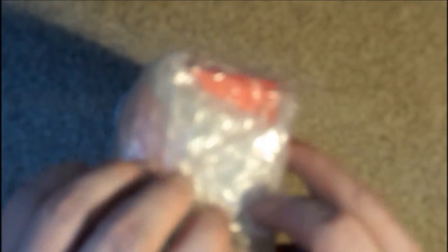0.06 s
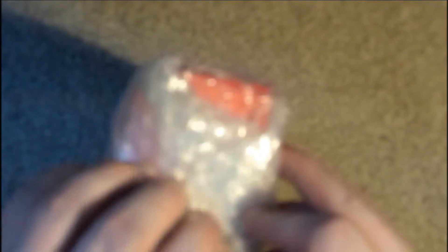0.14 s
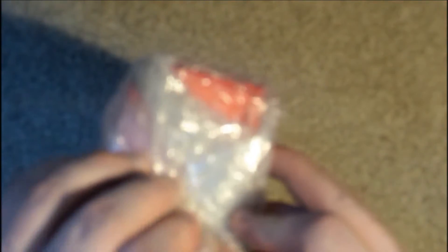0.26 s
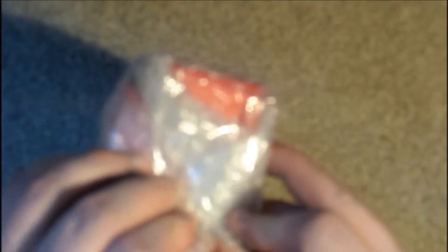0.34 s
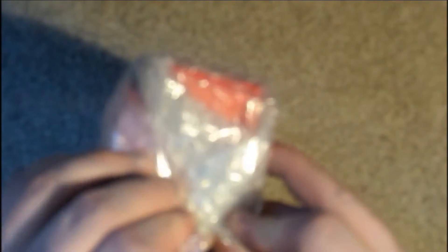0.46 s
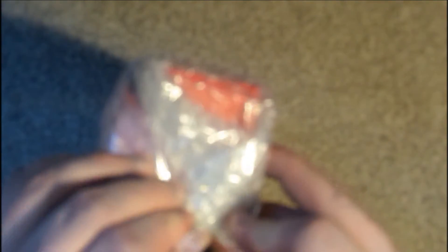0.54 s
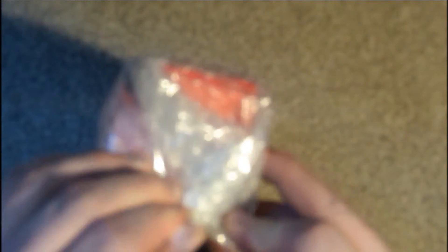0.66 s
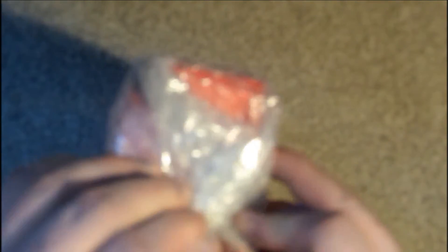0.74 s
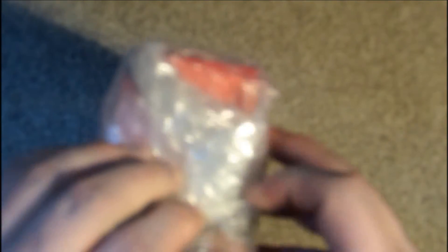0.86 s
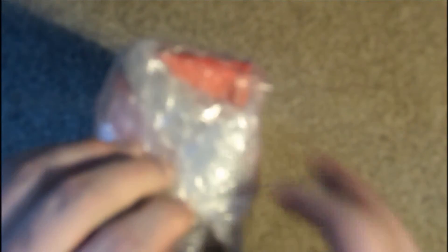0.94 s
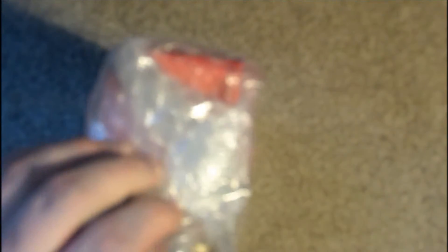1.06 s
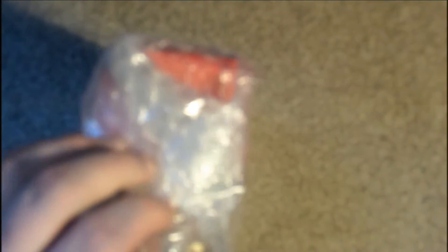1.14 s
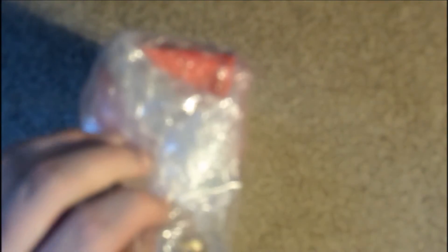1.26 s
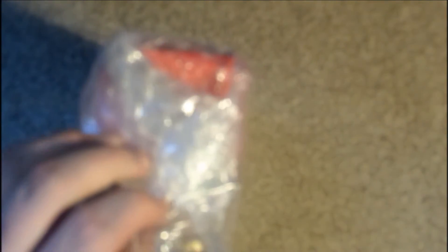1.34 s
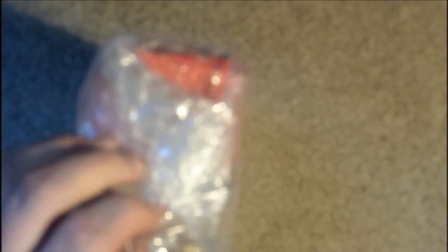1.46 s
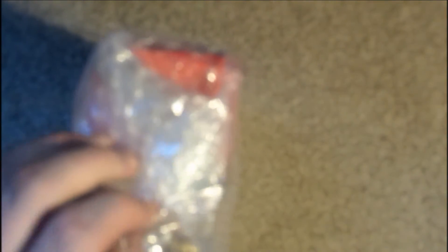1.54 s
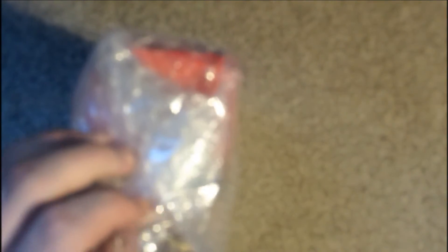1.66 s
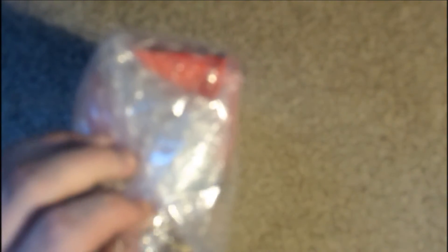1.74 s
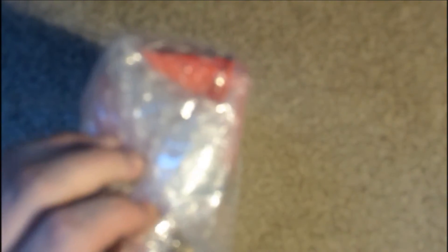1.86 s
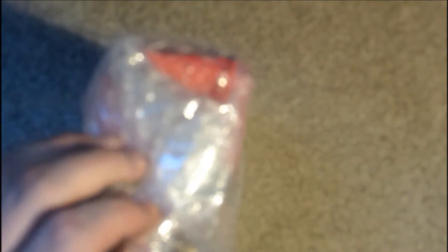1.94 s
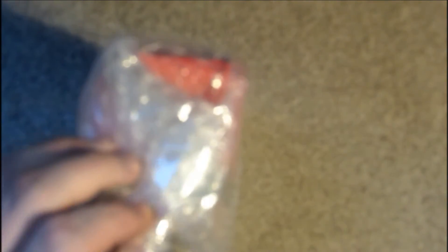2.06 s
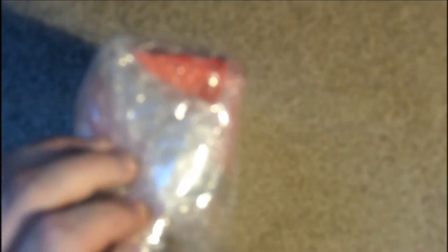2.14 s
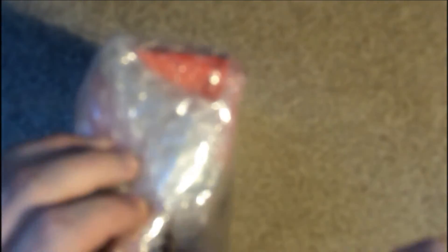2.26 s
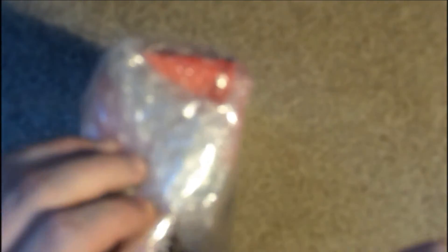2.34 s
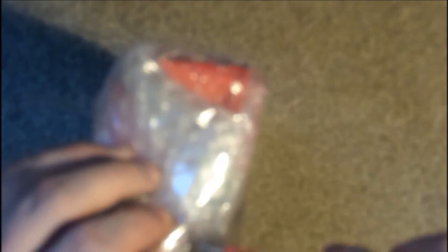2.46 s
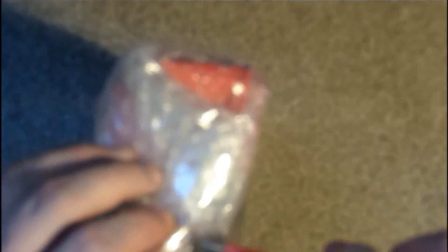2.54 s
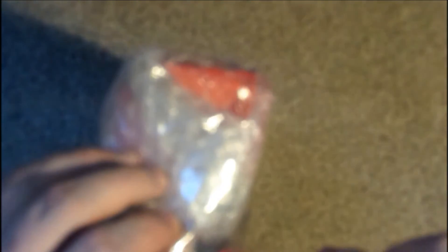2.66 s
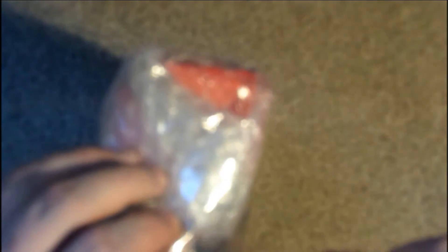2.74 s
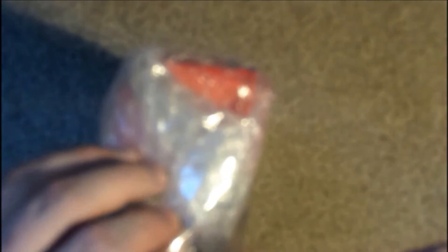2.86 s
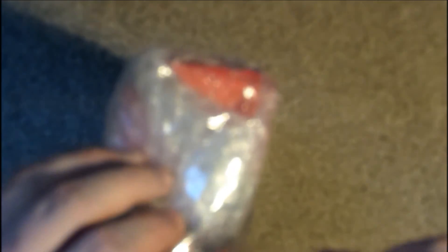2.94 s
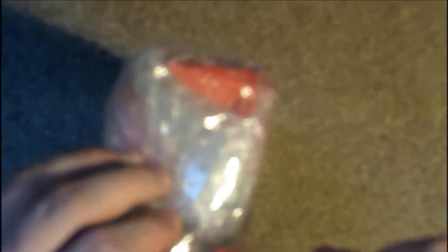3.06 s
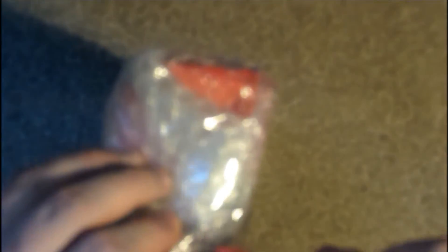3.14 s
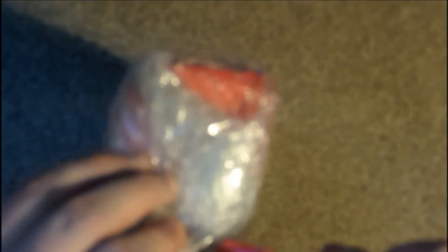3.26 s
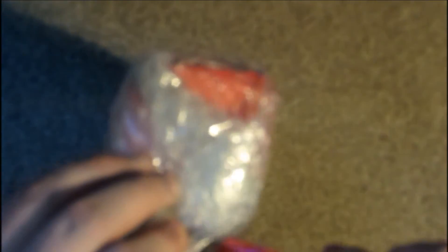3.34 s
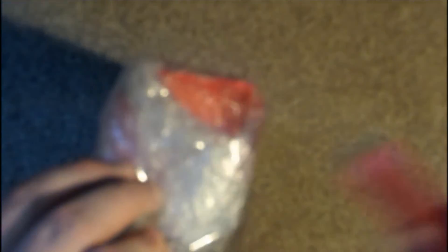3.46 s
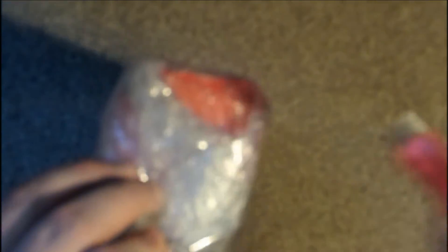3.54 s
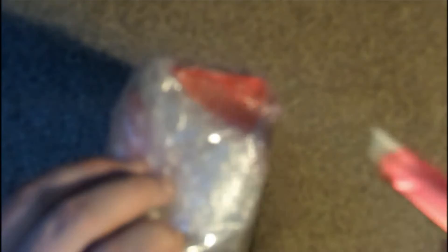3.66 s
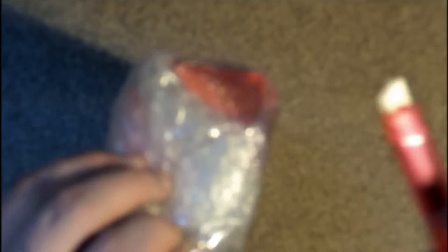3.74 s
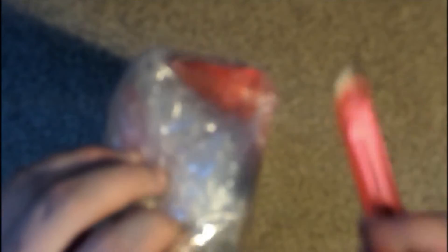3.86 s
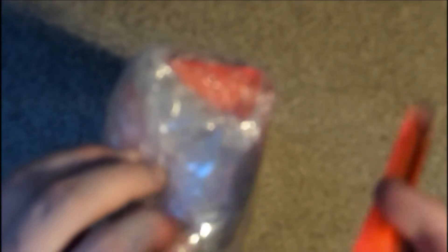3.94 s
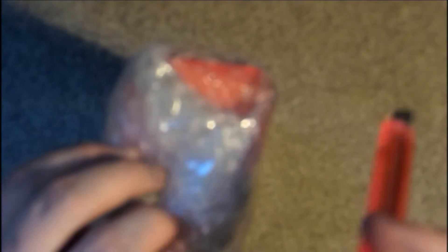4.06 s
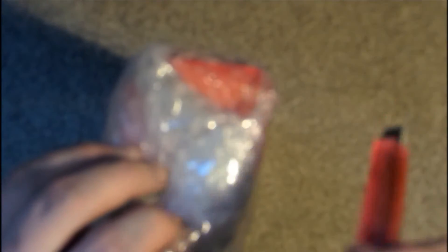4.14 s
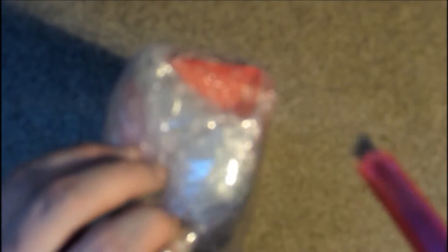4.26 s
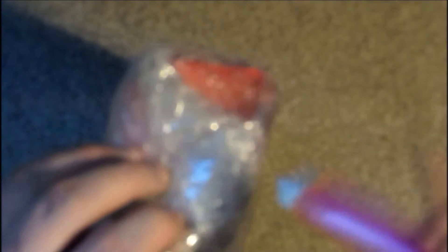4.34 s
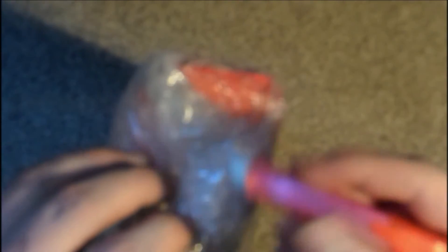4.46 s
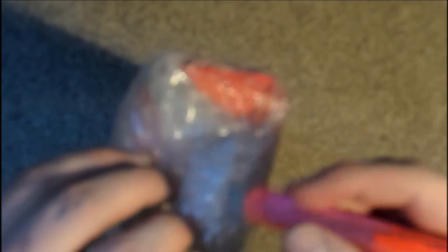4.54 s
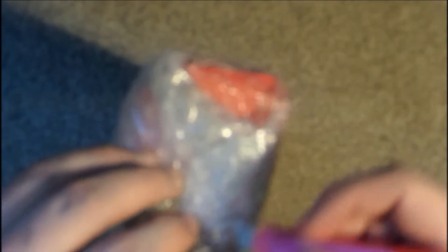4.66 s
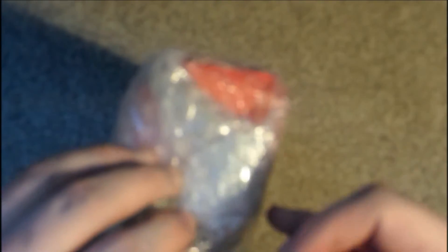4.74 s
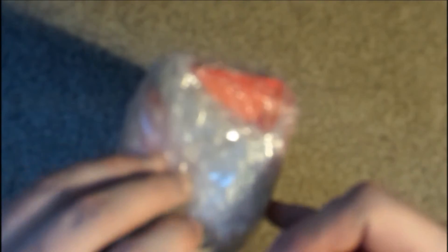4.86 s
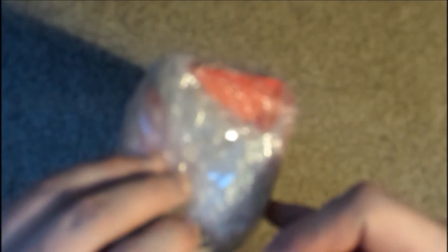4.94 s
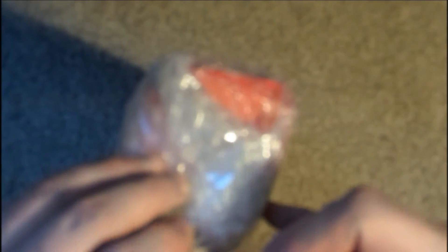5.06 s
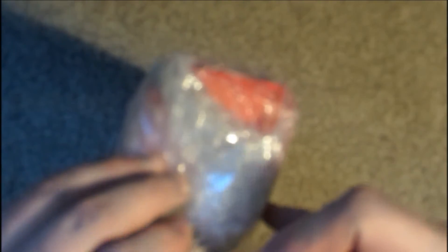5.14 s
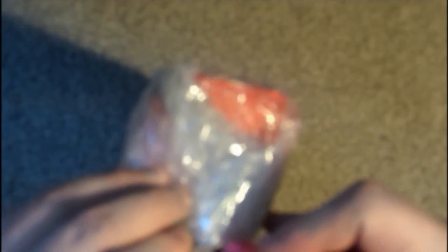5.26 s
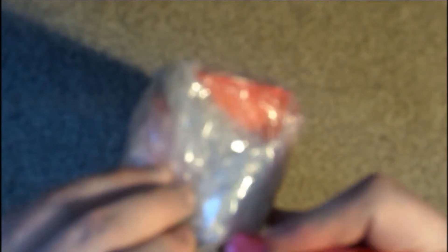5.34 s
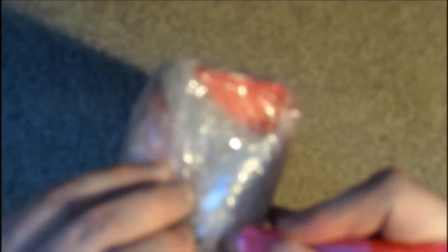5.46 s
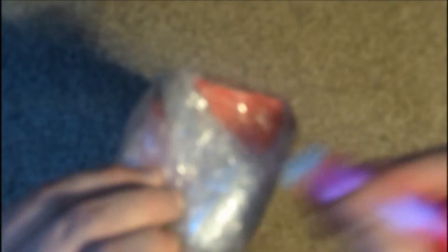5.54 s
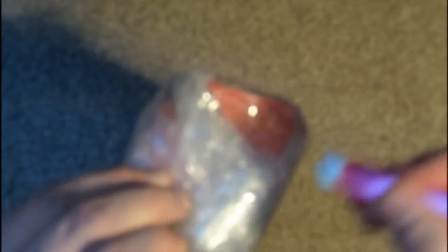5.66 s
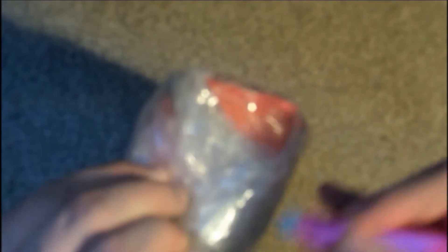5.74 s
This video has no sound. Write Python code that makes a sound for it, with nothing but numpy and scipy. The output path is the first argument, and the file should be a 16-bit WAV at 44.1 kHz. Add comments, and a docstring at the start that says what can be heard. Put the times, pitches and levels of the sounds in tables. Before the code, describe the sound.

Close to a small microphone, plastic wrapping crackles brightly as hands squeeze a package and rub it on the carpet. A seam peels briefly, then the crinkling turns sparse and soft, and a small blade ticks faintly twice. One loud crack comes past the middle, then a cluster of little pops, and two more hard snaps with finger knocks near the end. The room is quiet, with a short reverb and low background tone.

```python
"""A flurry of sharp crackles, close to a small microphone: fingers work a parcel of thin plastic film
on the carpet of a quiet room. Creases snap over, singly and in flurries; the film rustles and the
parcel rubs on the floor. Dimples pop with a pitch, fingers knock and drag, a sticky seam peels,
and twice a small steel blade ticks and rings. Behind it all lie a short reverb and low room tone."""
import sys
import numpy as np
from scipy import signal
from scipy.fft import rfft, irfft, next_fast_len
from scipy.io import wavfile
from scipy.ndimage import uniform_filter1d, map_coordinates

SR = 44100
rng = np.random.default_rng(int(sys.argv[2]) if len(sys.argv) > 2 else 0)


def wav_out(sig):
    """Save sig, one row per channel (or a flat mono array), as 16-bit PCM at SR to the path in sys.argv[1]."""
    wavfile.write(sys.argv[1], SR, np.round(np.clip(np.atleast_2d(sig).T, -1, 1) * 32767).astype(np.int16))


N = 255780

# Levels in the tables are relative.
# creases snapping over: (time [s], crack level [dB], panel flex level [dB])
CREASE_SNAPS = [(0.0414, -32, -27), (0.053, -13.5, -25.5), (0.0833, -30, -27.5), (0.1135, -20.5, -24.5),
                (0.1463, -17.5, -29), (0.163, -18.5, -29.5), (0.1764, -17, -30), (0.193, -9.5, -33),
                (0.2255, -11.5, -45), (0.238, -22, -32), (0.306, -8, -23), (0.3345, -19, -40),
                (0.3393, -23, -49), (0.3751, -18, -31), (0.7022, -19, -32), (0.707, -13.5, -31.5),
                (0.841, -26, -42), (0.8605, -21, -41), (0.8935, -18, -40), (0.9335, -26, -41),
                (1.5198, -21.5, -37.5), (1.779, -40, -40), (1.7923, -27.5, -34.5), (1.852, -33, -41),
                (1.9632, -20, -32), (2.0022, -36, -37.5), (1.921, -35.5, -38), (2.157, -33.5, -58),
                (2.367, -32, -36), (2.4145, -36.5, -30.5), (2.4777, -30, -55), (2.5614, -42, -35),
                (2.591, -45, -37.5), (2.774, -31, -35.5), (2.8045, -37, -41), (2.813, -27, -32),
                (2.83, -40, -36), (2.942, -34, -29), (2.9758, -25, -58), (3.0244, -41, -33),
                (3.086, -36, -57), (3.126, -26, -33.5), (3.32, -26.5, -37), (3.4781, -4, -54),
                (3.48, -11.5, -11.5), (3.604, -28.5, -35.5), (3.6445, -33, -44), (3.679, -29.5, -50),
                (3.765, -26.5, -32), (3.83, -44.5, -38.5), (3.925, -28.5, -40), (3.976, -29.5, -44),
                (4.037, -23, -37.5), (4.3319, -28, -58), (4.351, -29.5, -37), (4.37, -32, -55),
                (4.396, -32, -59.5), (4.4102, -44, -20.5), (4.4177, -17, -22.5), (4.4212, -23, -36),
                (4.4469, -20.5, -22.5), (4.4669, -25.5, -28.5), (4.511, -29, -59), (4.5434, -26.5, -30),
                (4.581, -31, -33), (4.5899, -30.5, -28), (4.6634, -32, -33), (4.692, -29, -32),
                (4.748, -32.5, -60), (5.0986, -36, -57), (5.2311, -8, -10.5), (5.2983, -26.5, -49),
                (5.347, -32, -35), (5.367, -27, -36.5), (5.452, -35, -63.5), (5.5463, -28, -33),
                (5.567, -8, -27), (5.5715, -12, -12), (5.726, -25, -60), (5.7837, -36.5, -40.5)]
# resonances of taut panels of film: (frequency [Hz], width [Hz], level [dB])
PANEL_MODES = [(3300, 4100, 5), (5580, 5000, 5)]
# hollows of the parcel: (frequency [Hz], width [Hz], level [dB])
PARCEL_MODES = [(202, 150, -3.5), (403, 123, 0), (614, 206, -2.5), (970, 250, 1), (1545, 256, 0),
                (1833, 225, 3), (3140, 5600, -9.5)]
# the resting grip: (time [s], rustle level [dB], rubbing level [dB])
RESTING_GRIP = [(0, -36, -41), (.3, -41, -41.5), (.6, -49.5, -50.5), (.9, -53, -49.5), (1.4, -55, -62),
                (1.6, -52.5, -51.5), (1.8, -52, -59), (2.1, -55, -54.5), (2.3, -69, -66), (2.6, -77, -49),
                (2.9, -53.5, -59.5), (3.4, -46, -53.5), (4.0, -56, -60.5), (4.3, -56, -63.5),
                (4.6, -48, -50.5), (4.85, -69, -61.5), (5.2, -51, -52.5), (5.8, -50, -57.5)]
# squeezes: (peak time [s], level [dB], time to fade 10 dB [s]); a negative fade reverses the shape
FILM_SQUEEZES = [(0.15, -30, 0.2332), (0.64, -44, 0.1), (0.88, -33.5, 0.15), (1.256, -41, 0.05),
                 (1.8, -49.5, 0.27), (2.0, -49.5, 0.15), (2.18, -43.5, 0.1), (2.35, -44, -0.14),
                 (2.51, -45.5, 0.26), (2.79, -41, 0.085), (3.011, -40, 0.03), (3.13, -45, 0.05),
                 (3.33, -42.5, 0.17), (3.772, -40.5, -0.04), (4.43, -41.5, 0.06), (4.63, -42.5, 0.12),
                 (4.908, -42.5, 0.09), (5.13, -51, .1), (5.369, -42.5, 0.07), (5.568, -29, 0.0567)]
# spectrum of sliding film: (frequency [Hz], level [dB])
FILM_SPECTRUM = [(1500, -22), (2500, -4.5), (5000, -7), (9000, -9.5), (13500, -0.5), (16000, -8)]
# dimples popping: (time [s], level [dB], pitch [Hz])
DIMPLE_POPS = [(0.6546, -31, 3680), (1.6883, -29.5, 4310), (1.7917, -28, 3910), (1.9734, -34, 4450),
               (2.017, -31, 4260), (2.0275, -31, 4000), (2.219, -28, 4440), (2.466, -32.5, 1780),
               (2.823, -27.5, 4080), (3.513, -24, 3980), (4.1102, -31.5, 4750), (4.4114, -26.5, 4560),
               (4.421, -18.5, 3500), (4.4651, -26, 3560), (4.5214, -31, 3580), (4.545, -24, 5100),
               (4.5796, -28, 5030), (4.588, -25.5, 5250), (4.6284, -32.5, 4310), (4.6623, -27.5, 4400),
               (5.0548, -33, 3730), (5.1206, -30.5, 3780)]
# fingers knocking the parcel: (time [s], level [dB])
FINGER_KNOCKS = [(0.0524, -27), (0.114, -25), (0.1465, -38.5), (0.1866, -34), (0.2255, -30.5), (0.306, -31),
                 (0.8603, -32.5), (.968, -31.5), (1.24, -40), (2.412, -30), (2.5614, -32.5),
                 (2.5904, -35.5), (2.943, -38), (3.0241, -36.5), (3.126, -34), (3.247, -38), (3.479, -16.5),
                 (3.7653, -37), (4.1108, -39), (4.4476, -36), (5.2315, -17.5), (5.271, -30),
                 (5.5673, -17.5)]
# the seam peeling: (time [s], slip rate [1/s], level [dB])
SEAM_PEEL = [(0.591, 150, -29), (0.62, 120, -24), (0.634, 210, -24), (.645, 380, -28), (0.661, 220, -25),
             (.677, 190, -25)]
# fingertips dragging: (time [s], level [dB], pitch [Hz])
FINGER_DRAGS = [(0.758, -44, 443), (0.806, -44.5, 420), (0.856, -42.5, 367), (0.963, -41, 355),
                (1.232, -49, 590)]
# ticks of the blade: (time [s], level [dB])
BLADE_TICKS = [(1.5195, -45.5), (1.964, -53)]
# modes of the blade: (frequency [Hz], level [dB], t60 [s])
BLADE_MODES = [(5400, 7.5, 0.042), (7860, 1.5, 0.25), (10600, 1, 0.28)]
# the room's decay: (frequency [Hz], t60 [s])
ROOM_DECAY = [(150, 0.24), (2000, 0.29), (16000, 0.094)]
# spectrum of the room tone: (frequency [Hz], level [dB])
ROOM_TONE = [(15, -25), (40, -2), (80, 4), (240, 2.5), (900, -3.5), (2800, -21), (9000, -55), (16000, -35)]

LEAD_S = 0.004  # a faint lead-in is heard this long before each burst


def snaps():
    """Right at the microphone, each crease cracks, flexes a panel of film and thuds into the parcel."""
    times, crack_db, panel_db = np.transpose(CREASE_SNAPS)
    starts = times - LEAD_S
    shiver_db = -4 + 1.53 * panel_db  # the harder the flex, the more the parcel shivers
    crack = lay(starts, bursts(crack_db + 4, shiver_db, hold_s=0.0011, t60=0.15))
    flex = lay(starts, bursts(panel_db - 4.5, shiver_db, hold_s=0.0027, t60=0.17))
    treble = band(crack, lo_hz=7250, hi_hz=17800)
    panel = band(resonate(flex, PANEL_MODES), lo_hz=1950, hi_hz=6800)
    return treble + panel + thuds(starts, panel_db - 17)


def bursts(db, shiver_db, hold_s, t60):
    """Sharp noise bursts with a faint, soft lead-in, a brief hold and a shivering tail."""
    t = np.arange(SR // 6) / SR - LEAD_S
    after = np.maximum(t, 0)
    size = (len(db), len(t))
    after_crackle_db = 4.05 * unit(uniform_filter1d(rng.standard_normal(size), size=110, axis=1))
    span = hold_s * amp(0.22 * (db + 46.5))[:, None]  # loud bursts hold longer
    hold = 0.49 * np.exp(-(after / span) ** 2)
    spike = np.exp(-after / 0.00021)
    shiver = amp(shiver_db[:, None] - 60 * after / t60 + after_crackle_db)
    lead_in = np.where(t < 0, 0.14 * amp(60 * t / 0.011), 1)
    return amp(db)[:, None] * rng.standard_normal(size) * (hold + spike + shiver) * lead_in


def thuds(starts, db):
    """Dull blows sound through the parcel's hollows; hard ones shake it longer."""
    blows = lay(starts, bursts(db - 5, shiver_db=0.77 * db - 8, hold_s=0.0026, t60=0.26))
    return band(resonate(blows, PARCEL_MODES), lo_hz=119, hi_hz=3150)


def handling():
    """Sliding film hisses and crackles; rubbing on the carpet sounds through the parcel's hollows."""
    times, grip_rustle_db, grip_rub_db = np.transpose(RESTING_GRIP)
    t = np.arange(N) / SR
    squeeze = squeeze_power()
    rustle_db = 10 * np.log10(amp(np.interp(t, times, grip_rustle_db)) ** 2 + squeeze)
    # a squeeze also drags the parcel, more softly
    rub_db = 10 * np.log10(amp(np.interp(t, times, grip_rub_db)) ** 2 + amp(-8.5) ** 2 * squeeze)
    slip_db = 1.2 * wobble(23.8)
    hiss = shaped_noise(FILM_SPECTRUM)
    hollows = resonate(rng.standard_normal(N), PARCEL_MODES)
    sliding = amp(rustle_db - 3 + slip_db + 3.33 * wobble(150)) * hiss
    rubbing = amp(rub_db + 2.7 * wobble(90)) * hollows
    return sliding + rubbing + crackle(rustle_db, count=5000)


def squeeze_power(rise_share=0.57, roundness=1.19):
    """Summed power of the squeezes, each swelling to a rounded top and fading."""
    t = np.arange(N) / SR
    power = np.zeros(N)
    for peak, db, fade in FILM_SQUEEZES:
        from_peak = np.maximum((t - peak) / fade, (peak - t) / (rise_share * fade))
        power += amp(db - 10 * from_peak ** roundness) ** 2
    return power


def crackle(rustle_db, count):
    """Countless small creases: damped clicks of a cycle or two, some stronger, in clumps."""
    when, rank, damping, phase = rng.random((count, 4)).T
    starts = when * (N - 1) / SR
    hz = np.clip(11000 * np.exp(0.29 * rng.standard_normal(count)), 4500, 15500)[:, None]
    clumps_db = rustle_db + 4.7 * wobble(34)
    click_db = clumps_db[(starts * SR).astype(int)] - 4 * np.log(rank + 0.0096)
    t = np.arange(SR // 400) / SR
    cycles = 0.97 + 0.88 * damping[:, None] ** 2
    clicks = np.sin(2 * np.pi * (hz * t + phase[:, None])) * np.exp(-t * hz / cycles)
    return band(lay(starts, amp(click_db)[:, None] * clicks), lo_hz=3560, hi_hz=18000)


def pops(t60=0.013):
    """Each dimple of film pops and rings briefly on two modes."""
    starts, db, hz = np.transpose(DIMPLE_POPS)[:, :, None]
    t = np.arange(SR // 30) / SR
    upper_hz = 1.4 * hz * (1 + 0.06 * rng.standard_normal(hz.shape))
    ring = np.sin(2 * np.pi * hz * t) + amp(-6.5) * np.sin(2 * np.pi * upper_hz * t)
    attack = 1 - np.exp(-t / 0.00023)
    return lay(starts[:, 0], amp(db - 60 * t / t60) * attack * ring)


def knocks():
    """Fingertips tap the hollow parcel."""
    times, db = np.transpose(FINGER_KNOCKS)
    return thuds(times - LEAD_S, db)


def peel(t60=0.0019):
    """The seam lets go with one thin, bright click for each slip of the glue."""
    times, rate, db = np.transpose(SEAM_PEEL)
    t = np.arange(times[0], times[-1], 1 / SR)
    slip_count = np.floor(np.cumsum(np.interp(t, times, rate)) / SR - 0.1)
    slips = t[1:][np.diff(slip_count) > 0]
    age = np.arange(SR // 500) / SR
    clicks = rng.standard_normal((len(slips), len(age))) * amp(-60 * age / t60)
    gain = amp(np.interp(slips, times, db))[:, None]
    return band(lay(slips, gain * clicks), lo_hz=10700, hi_hz=15000)


def drags(rise_s=0.0081, sag_per_s=2.7):
    """A dragging fingertip draws a soft low note that swells, sags in pitch and fades."""
    starts, db, hz = np.transpose(FINGER_DRAGS)[:, :, None]
    t = np.arange(SR // 8) / SR
    swell = t / rise_s * np.exp(1 - t / rise_s)
    note = np.sin(2 * np.pi * hz * t * (1 - sag_per_s * t / 2))
    return lay(starts[:, 0], amp(db) * swell * note)


def blade():
    """Each tick rings the steel, unevenly, as it is held in a moving hand."""
    starts, db = np.transpose(BLADE_TICKS)
    t = np.arange(SR // 4) / SR
    ring = sum(amp(level + 6.3 * wobble(136)[:len(t)] - 60 * t / t60) * np.sin(2 * np.pi * hz * t)
               for hz, level, t60 in BLADE_MODES)
    return lay(starts, amp(db)[:, None] * ring)


def room(x):
    """The room stores energy and returns it as diffuse noise, each frequency dying at its own speed."""
    hz, t, spectrum = signal.stft(x, SR, nperseg=256)
    power = uniform_filter1d(np.abs(spectrum) ** 2, size=9, axis=0)
    keep = amp(-120 * t[1] / along(ROOM_DECAY, hz))  # share of the energy left after one frame
    stored = np.array([signal.lfilter([0, 0, 1 - k], [1, -k], p) for k, p in zip(keep, power)])
    noise = signal.stft(rng.standard_normal(N), SR, nperseg=256)[2]
    diffuse = np.sqrt(np.abs(stored)) * noise / np.abs(noise).mean()
    return signal.istft(diffuse, SR, nperseg=256)[1][:N]


def shaped_noise(spectrum):
    """Steady noise of unit RMS with the given spectrum."""
    return unit(filtered(rng.standard_normal(N), lambda hz: amp(along(spectrum, hz))))


def resonate(x, modes):
    """x through resonances of alternating sign, keeping the power of white noise."""
    def response(f):
        total = sum((-1) ** k * amp(db) * 1j * f * width / (hz * hz - f * f + 1j * f * width)
                    for k, (hz, width, db) in enumerate(modes))
        return total / np.sqrt(np.mean(np.abs(total) ** 2))
    return filtered(x, response)


def filtered(x, response):
    """x through a complex frequency response."""
    size = next_fast_len(N + SR // 2)
    return irfft(rfft(x, size) * response(np.fft.rfftfreq(size, 1 / SR)), size)[:N]


def band(x, lo_hz, hi_hz):
    """A causal band-pass that keeps the power of white noise."""
    sos = signal.butter(2, [lo_hz, hi_hz], "bandpass", fs=SR, output="sos")
    return signal.sosfilt(sos, x) * np.sqrt(SR / 2 / (hi_hz - lo_hz))


def lay(starts, shapes):
    """Sum of short shapes, one row for each start time."""
    at = (starts * SR).astype(int)[:, None] + np.arange(shapes.shape[1])
    return np.bincount(at.ravel(), shapes.ravel(), N + SR)[:N]


def wobble(rate):
    """A smooth random curve, rate knots a second."""
    return map_coordinates(rng.standard_normal(int(N * rate / SR) + 4), [np.arange(N) * rate / SR])


def along(points, hz):
    """Interpolate (frequency [Hz], value) points on a log axis."""
    knots_hz, values = np.transpose(points)
    return np.interp(np.log(hz + 1), np.log(knots_hz + 1), values)


def amp(db):
    return 10 ** (np.asarray(db) / 20)


def unit(x):
    return x / np.sqrt(np.mean(x ** 2) + 1e-20)


def scene():
    """The parcel close up, the quiet room well behind it, in mono."""
    near = snaps() + pops() + knocks() + blade() + peel() + drags()
    room_tone = amp(-57) * shaped_noise(ROOM_TONE)
    return (near + amp(-11) * room(near) + handling() + room_tone)[None]


def record(dry, top_hz=16000, stop_hz=16800):
    """The loudest cracks reach the recorder's soft ceiling; little is kept above its band limit."""
    limited = dry[0] / (1 + np.abs(dry[0]) ** 4) ** (1 / 4)
    shelf = amp(-18)
    low_pass = lambda hz: (shelf + (1 - shelf) / (1 + (hz / top_hz) ** 120)) * (hz < stop_hz)
    return filtered(limited, low_pass)[None]


dry = scene()
out = record(dry)
wav_out(out)
```